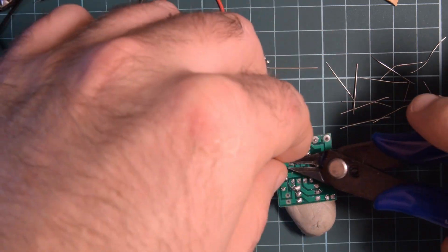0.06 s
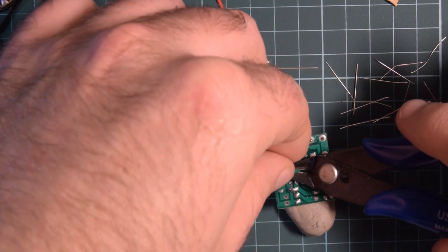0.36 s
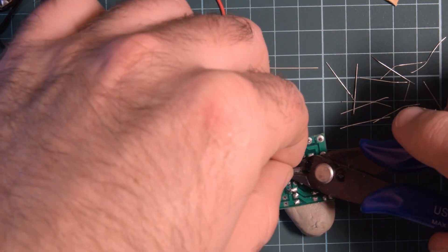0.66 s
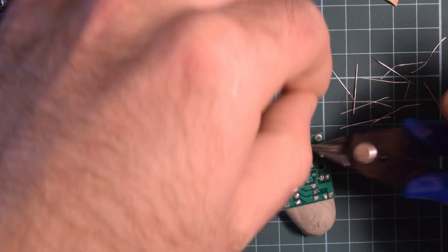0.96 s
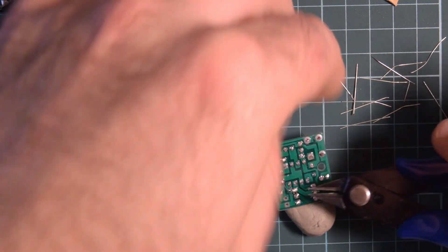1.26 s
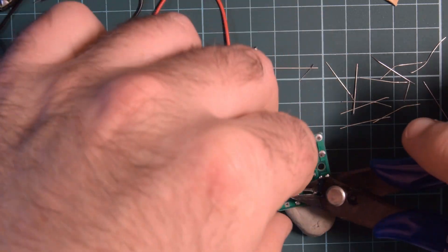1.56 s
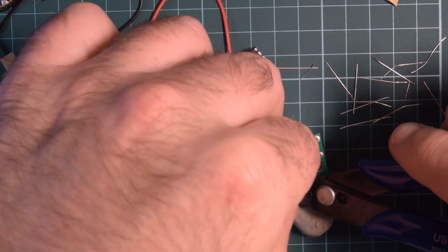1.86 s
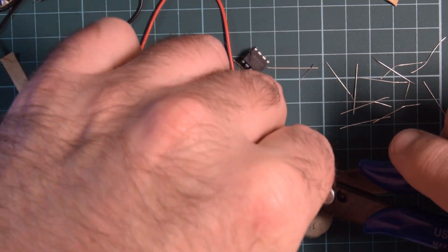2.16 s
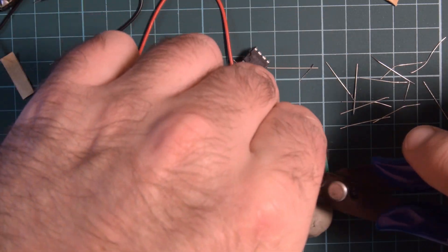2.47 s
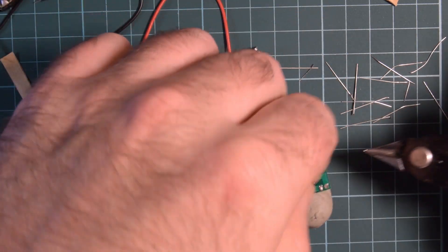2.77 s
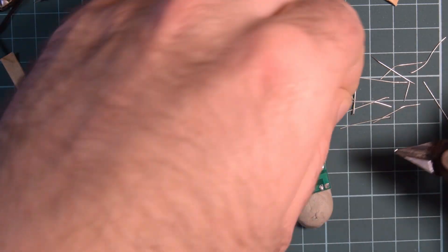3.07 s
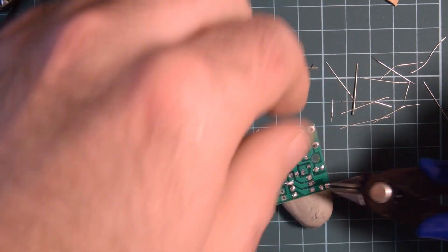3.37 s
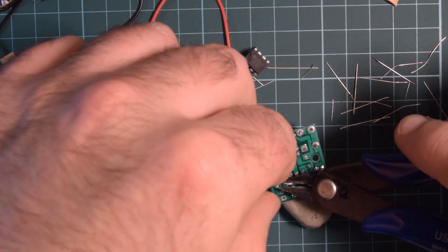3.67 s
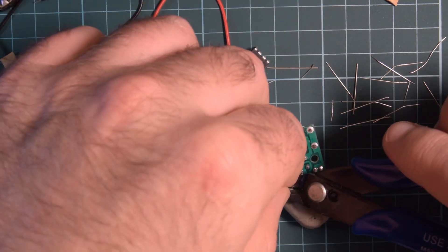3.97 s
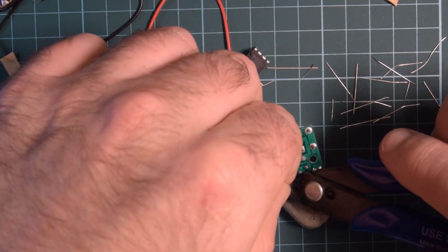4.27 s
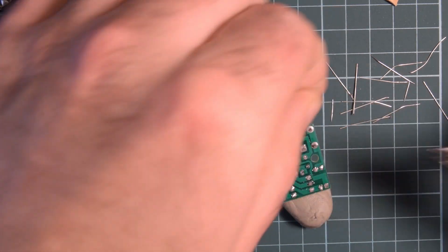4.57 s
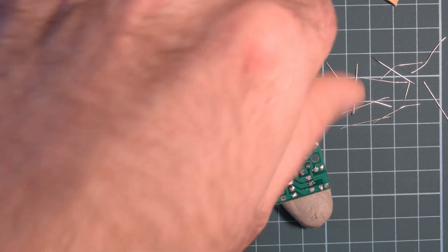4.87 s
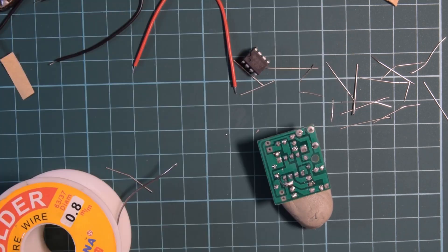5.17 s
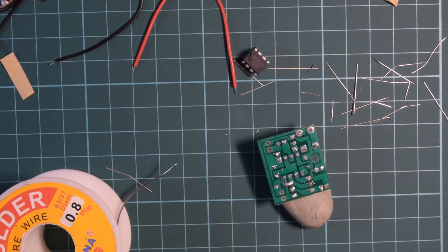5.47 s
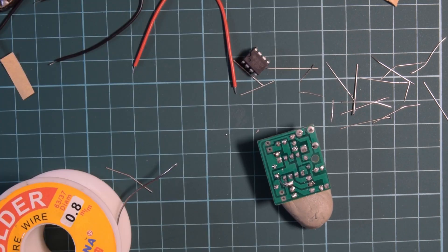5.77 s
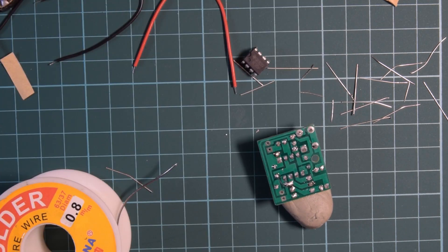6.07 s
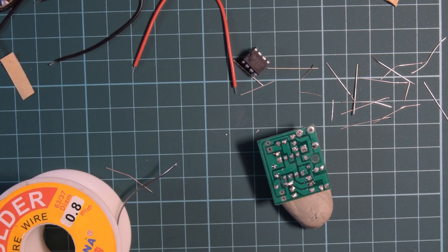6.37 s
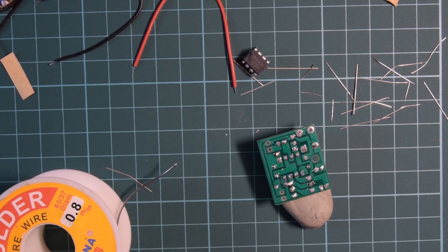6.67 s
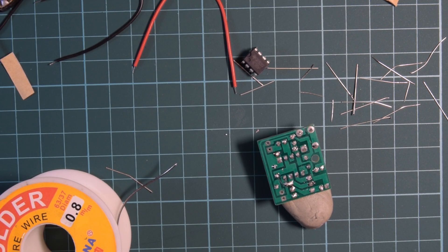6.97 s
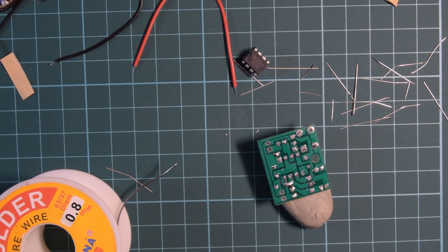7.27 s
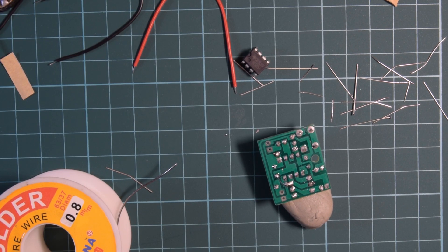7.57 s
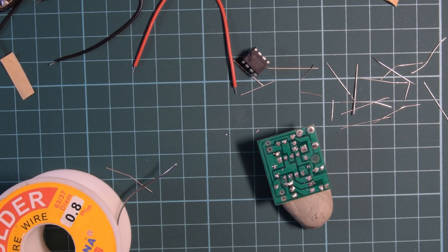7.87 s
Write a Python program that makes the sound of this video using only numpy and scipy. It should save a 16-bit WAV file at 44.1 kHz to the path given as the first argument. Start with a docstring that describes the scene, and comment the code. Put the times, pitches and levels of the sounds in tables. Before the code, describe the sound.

Close to the microphone at a workbench, a faint low hum fills a small dry room. Three spaced snaps come as cutters trim wire legs from a circuit board, with a soft bump between the second and third. Then the cutters and a plastic spool go down with a louder, hollow clatter. Ringing metal clacks follow, probably a soldering iron in its stand, mixed with light scratchy wiping and small jabs.

```python
"""A low hum in a small dry room, and a soft thump on a workbench mat. Close to the one microphone,
flush cutters snip three wire legs off a small circuit board, each a snap with a ring of the jaws.
The cutters are laid aside and a solder spool is set down, rocking on the booming bench top.
A metal tool, likely a soldering iron, clacks in its ringing stand and is wiped with a fine scratch.
A limiter on the microphone holds down the loudest knocks."""
import sys
import numpy as np
from scipy import signal
from scipy.fft import rfft, irfft, next_fast_len
from scipy.io import wavfile
from scipy.ndimage import uniform_filter1d, minimum_filter1d

SR = 44100
rng = np.random.default_rng(int(sys.argv[2]) if len(sys.argv) > 2 else 0)


def wav_record(signal):
    """Record a signal, one row per channel, as 16-bit PCM in the file named by sys.argv[1]."""
    frames = np.transpose(np.atleast_2d(signal))
    bounded = np.clip(frames, -1, 1)
    # unit amplitude maps onto the largest positive 16-bit level
    quanta = np.round(bounded * 32767).astype(np.int16)
    wavfile.write(sys.argv[1], SR, quanta)


N = 357651
RING_SIZE, FFT_SIZE = 8192, next_fast_len(N, real=True)
TIME, AGE = np.arange(N) / SR, np.arange(RING_SIZE) / SR  # seconds into the scene, and since a contact
FREQS = np.fft.rfftfreq(FFT_SIZE, 1 / SR)


def amp(db):
    """Decibels to gain."""
    return 10 ** (np.asarray(db) / 20)


def unit_rms(x):
    """Scale to an rms of one."""
    return x / np.sqrt(np.mean(x ** 2))


def at_level(x, db):
    """Scale a short sound so that its energy, spread over a fiftieth of a second, has this level."""
    return x * amp(db) * np.sqrt(SR / 50 / np.sum(x ** 2, axis=-1, keepdims=True))


def fade(t60):
    """Exponential decay, 60 dB down after t60 seconds."""
    return np.exp(-np.log(1000) * AGE / t60)


def swell(s, attack_s, hold_s, t60):
    """Pressure that builds, holds and dies away."""
    age = TIME - s
    rise = np.clip(age / attack_s, 0, 1) ** 2
    return rise * np.exp(-np.log(1000) * np.maximum(age - attack_s - hold_s, 0) / t60)


def colour_db(points, hz):
    """Read a spectrum on a log-frequency axis."""
    point_hz, db = np.transpose(points)
    return np.interp(np.log(hz + 1), np.log(point_hz), db)


def coloured(x, points):
    """Give a steady sound a spectrum."""
    return unit_rms(irfft(rfft(x, FFT_SIZE) * amp(colour_db(points, FREQS)), FFT_SIZE)[:N])


def resonant_noise(peaks):
    """Noise in steep resonances."""
    gain = sum(amp(db) / (1 + (2 * (FREQS - hz) / width) ** 2) for hz, width, db in peaks)
    return unit_rms(irfft(rfft(rng.standard_normal(FFT_SIZE)) * gain, FFT_SIZE)[:N])


def add(track, s, x):
    """Mix a short sound in at s seconds."""
    start = int(s * SR)
    track[start:start + len(x)] += x[:N - start]


def crack(colour, t60, slope, treble_db=0, bass_db=0, treble_hz=3500, bass_hz=450, rise_s=0.00073):
    """A dense cloud of short-lived modes; the low ones build up later and last longer."""
    edges = np.geomspace(90, 16500, 27)[:, None]
    lo, hi = edges[:-1], edges[1:]
    hz, bins = np.sqrt(lo * hi), np.fft.rfftfreq(RING_SIZE, 1 / SR)
    bands = irfft(rfft(rng.standard_normal(RING_SIZE)) * ((bins >= lo) & (bins < hi)))
    onset = 1 - np.exp(-(AGE / (rise_s + 1 / hz)) ** 2)
    bands = bands * fade(t60 * (2000 / hz) ** slope) * onset
    share = amp(colour_db(colour, hz)) * np.sqrt(hi - lo)
    shelves_db = treble_db / (1 + (treble_hz / hz) ** 3) + bass_db / (1 + (hz / bass_hz) ** 3)
    return np.sum(at_level(bands, shelves_db) * share / np.linalg.norm(share), axis=0)


def ring(modes, db, contact_s, sag=0, spread_db=4.0, detune=0.0016, settle_s=0.0023):
    """Struck modes, weighted anew each time; with sag, they start flat and glide quickly up to pitch."""
    chance = rng.standard_normal((len(modes), 3))
    clock = AGE - sag * settle_s * (1 - np.exp(-AGE / settle_s))
    ringing = np.zeros(RING_SIZE)
    for (hz, mode_db, t60), (weight, mistune, polarity) in zip(modes, chance):
        tone = np.sign(polarity) * np.sin(2 * np.pi * hz * (1 + detune * mistune) * clock)
        ringing += amp(mode_db + spread_db * weight) * tone * fade(t60)
    return at_level(ringing * (1 - np.exp(-AGE / contact_s)), db)


# Low resonances of the room. Each row: frequency in Hz, width in Hz, relative level in dB.
ROOM_MODES = [(34.5, 9, -12.5), (58.6, 20, -6), (86.12, 12, 0), (102.6, 9.8, -4.5), (123.08, 15, -7),
              (146.2, 14, -7), (171.2, 15, -16), (226.06, 15, -19.5)]
# Spectrum of the hiss. Each row: frequency in Hz, relative level in dB.
HISS_COLOUR = [(20, -7), (100, -26.5), (220, 10.5), (400, 13), (600, 5.5), (1000, 2.5), (2000, -2.5),
               (4000, -5), (8000, -5.5), (16000, -8.5)]


def room_tone(hum_db=-60.0, hiss_db=-76):
    """A low, wavering hum in the room's resonances, over faint even hiss."""
    hum = amp(hum_db) * resonant_noise(ROOM_MODES)
    return hum + amp(hiss_db) * coloured(rng.standard_normal(N), HISS_COLOUR)


# Low thumps on the bench. Each row: start in seconds, pitch in Hz, level in dB.
BENCH_THUMPS = [(.162, 339, -61), (0.173, 265, -65.5), (2.744, 413, -54.5), (2.827, 387, -56.5),
                (3.914, 398, -70), (5.631, 400, -61), (5.694, 350, -61), (5.755, 383, -67),
                (5.838, 245, -49), (5.947, 236, -43.5), (5.958, 160, -44.5)]


def bench_thumps():
    """Low, damped thumps, from soft presses on the mat and the stand bumping the bench."""
    out = np.zeros(N)
    for s, hz, db in BENCH_THUMPS:
        add(out, s, ring([(hz, 0, .055)], db, contact_s=0.00089))
    return out


# Wire legs parting close to the microphone. Each row: start in seconds, level in dB, treble in dB,
# board ring in dB, thud pitch in Hz, thud level in dB.
WIRE_SNIPS = [(0.7788, -44.5, -17, -58, 423, -63), (2.2287, -46.5, 2, -97, 341, -60.5),
              (4.303, -46.5, -20.5, -68, 380.6, -59)]
# Spectrum of the snap. Each row: frequency in Hz, relative level in dB.
SNAP_COLOUR = [(500, -35.5), (1000, -34), (1700, -29), (2300, -18), (3100, -20), (3900, -8), (5000, 1.5),
               (6300, -3.5), (7200, -2.5), (9000, -6.5), (11500, -5), (12600, -18), (15500, -34)]
# Modes of the jaws and of the board. Each row: frequency in Hz, relative level in dB, t60 in seconds.
JAW_MODES = [(4560, -4, .02), (4780, -1, .02), (4930, 0, .02), (5120, 0, .02), (5690, -4, .02),
             (5970, -3, .025), (6260, -3, .03)]
BOARD_MODES = [(2000, 13, 0.04), (2246, -5, 0.012), (2370, 15, 0.018)]


def cutters(slam_s=0.005, slam_db=-6):
    """The wire snaps, the jaws ring and slam shut, and the board jolts against the mat."""
    out = np.zeros(N)
    for s, db, treble_db, board_db, thud_hz, thud_db in WIRE_SNIPS:
        for lag_s, share_db in ((0, 0), (slam_s, slam_db)):
            snap = crack(SNAP_COLOUR, t60=.012, slope=.2, treble_db=treble_db,
                         treble_hz=7500, rise_s=.0003)
            add(out, s + lag_s, amp(db + share_db) * snap)
        add(out, s, ring(JAW_MODES, db - 8, contact_s=.0002))
        add(out, s, ring(BOARD_MODES, board_db, contact_s=0.0013))
        add(out, s, ring([(thud_hz, 0, .05)], thud_db, contact_s=0.00104))
    return out


# Hand, cutters and spool meeting the bench. Each row: start in seconds, level in dB, treble in dB,
# bench boom in dB, plastic clack in dB, number of contacts, seconds between them.
BENCH_KNOCKS = [(2.7397, -57.5, 1.5, -66, -56, 1, 0), (2.824, -66, -30, -58, -68, 1, 0),
                (5.3412, -41, 12, -37.5, -53, 3, .014), (5.474, -39.5, -3.5, -40, -50, 1, 0),
                (5.4826, -33.5, 2.5, -39.5, -40.5, 2, 0.0056), (5.518, -47, -12, -42, -60, 1, 0),
                (5.539, -43, -0.5, -40.5, -65, 3, .0195)]
# Spectrum of a knock. Each row: frequency in Hz, relative level in dB.
BENCH_COLOUR = [(100, -11), (160, -10), (250, -9), (420, 2.5), (650, -7), (850, -0.5), (1200, -5),
                (2000, -6), (3000, -12.5), (5000, -20.5), (7000, -30.5), (9000, -48.5), (11000, -54.5),
                (15000, -63)]
# Modes of bench top and hollow plastic. Each row: frequency in Hz, relative level in dB, t60 in seconds.
BENCH_MODES = [(250, -12, .1), (340, -6, .08), (405, -3, .06), (458, 0, .075), (505, -6, .05)]
PLASTIC_MODES = [(970, 0, 0.051), (1278, 11, 0.022), (1346, 12, 0.0084), (1460, -2, 0.0088),
                 (1460, 18, 0.0195), (1620, 5, 0.0076), (1950, -18, 0.0067)]


def bench_knocks(rock_loss_db=6.5, boom_loss_db=1):
    """Things set down rock to rest, each contact weaker: plastic clatter over the boom of the bench."""
    out = np.zeros(N)
    for s, db, treble_db, boom_db, clack_db, contacts, gap_s in BENCH_KNOCKS:
        for k in range(contacts):
            at, loss_db = s + k * gap_s, k * rock_loss_db
            knock = crack(BENCH_COLOUR, t60=0.052, slope=0.13, treble_db=treble_db, treble_hz=3030)
            add(out, at, amp(db - loss_db) * knock)
            add(out, at, ring(BENCH_MODES, boom_db - k * boom_loss_db, contact_s=0.00086))
            add(out, at, ring(PLASTIC_MODES, clack_db - loss_db, contact_s=0.00017))
    return out


# The iron against its stand. Each row: start in seconds, level in dB, treble in dB, ring in dB,
# lean of the ring to its higher modes in dB per octave.
IRON_CLACKS = [(5.814, -52.5, -29, -71.5, -3), (5.821, -45.5, -30, -66, 6), (5.870, -41, -17, -45, -1.5),
               (5.899, -37.5, 1.5, -36.5, 6), (5.912, -41, 5.5, -40, -4), (5.9317, -36, -6.5, -35.5, 2),
               (5.9419, -37.5, -1, -57, -3.5), (6.009, -53, -1, -48, -1.5),
               (6.285, -63, -28.5, -65.5, -3.5), (6.355, -62.5, -5.5, -67, 3), (6.543, -40, 8, -30, 8),
               (6.7762, -38.5, -2.5, -30.5, -19), (7.268, -74, -5.5, -76, -5), (7.290, -66.5, -9, -68, -1),
               (7.6137, -41.5, -2.5, -33, 8.5), (7.857, -67, -8, -73.5, -3.5),
               (8.1, -74.5, -7, -65.5, -6.5)]
# Spectrum of a clack. Each row: frequency in Hz, relative level in dB.
STAND_COLOUR = [(100, -21), (160, 7), (260, 4), (480, 0), (650, -1), (820, 7), (1200, -1), (2200, 1),
                (3200, -0.5), (4400, -2.5), (5700, -8), (6800, -21), (9500, -36), (15000, -69.5)]
# Modes of the stand. Each row: frequency in Hz, relative level in dB, t60 in seconds.
STAND_MODES = [(1930, 0, 0.0067), (1940, 2.5, 0.014), (2010, -0.5, 0.033), (2080, 4, 0.06),
               (2235.3, -2, 0.032), (2430, 3, 0.017), (2433, 4, 0.051), (2870, -12.5, 0.049),
               (3030, -9.5, 0.033), (3350, -0.5, 0.023), (3653, -14, 0.021), (4400, -20, 0.024)]


def iron_in_stand(rebound_s=.007, rebound_db=-9.5, rebound_ring_db=-9, hard_db=-37.5, bass_per_db=0.3973):
    """The iron clacks and rebounds in its stand, whose close modes beat against each other."""
    out = np.zeros(N)
    lowest_hz = STAND_MODES[0][0]
    for s, db, treble_db, ring_db, lean_db in IRON_CLACKS:
        # the place struck favours some modes
        modes = [(hz, level + lean_db * np.log2(hz / lowest_hz), t60) for hz, level, t60 in STAND_MODES]
        rebound = (s + rebound_s, db + rebound_db, ring_db + rebound_ring_db)
        for at, hit_db, modes_db in ((s, db, ring_db), rebound):
            bass_db = bass_per_db * (hard_db - hit_db)  # softer contacts are rounder
            clack = crack(STAND_COLOUR, t60=0.05, slope=0.44, treble_db=treble_db, bass_db=bass_db)
            add(out, at, amp(hit_db) * clack)
            add(out, at, ring(modes, modes_db, contact_s=0.0018, sag=0.18))
    return out


# The strike on the iron's barrel: start in seconds, level in dB, ring in dB.
BARREL_STRIKE = (6.0202, -37, -39)
# Its spectrum. Each row: frequency in Hz, relative level in dB.
BARREL_COLOUR = [(120, -20), (380, 1), (650, -41), (900, -5), (1350, -18.5), (2300, -12.5), (3100, -6),
                 (4400, 0.5), (6000, -10), (8000, -26), (10000, -59.5), (15000, -45)]
# Modes of the barrel. Each row: frequency in Hz, relative level in dB, t60 in seconds.
BARREL_MODES = [(2310, 8.5, 0.03), (3120, 4, 0.097), (3463, -8, 0.066), (4200, 0, .06), (4160, -1, 0.053),
                (4300, 3, 0.055), (4530, 0, .06), (5120, -13, 0.068), (6490, -15, 0.045), (9600, -24, 0.14)]


def barrel_clink():
    """One bright strike sets the iron's barrel ringing."""
    out = np.zeros(N)
    s, db, ring_db = BARREL_STRIKE
    add(out, s, amp(db) * crack(BARREL_COLOUR, t60=0.026, slope=0.61, rise_s=0.00034))
    add(out, s, ring(BARREL_MODES, ring_db, contact_s=0.00014))
    return out


# The tip dragged through its cleaner. Each row: start and rise in seconds, level in dB, t60 in seconds.
TIP_STROKES = [(6.34, 0.014, -61.5, 0.42), (6.65, 0.05, -56.5, 0.57), (6.85, .05, -71, 1.5),
               (7.27, 0.048, -67, 0.3), (7.43, 0.18, -74.5, 1.9), (7.87, 0.089, -71.5, 0.1)]
# The tip jabbed into the cleaner's holder. Each row: start in seconds, level in dB.
TIP_JABS = [(6.936, -64), (6.984, -70.5), (7.119, -53), (7.337, -54.5), (7.922, -68)]
# Spectrum of the scratch. Each row: frequency in Hz, relative level in dB.
TIP_COLOUR = [(600, -16), (1100, 0), (1600, 0), (2200, 5), (3000, 1.5), (3700, -2.5), (4400, -2.5),
              (5900, -10), (6500, -15.5), (9000, -24), (15000, -47)]
# Resonances of the holder and of thin metal in it. Each row: frequency and width in Hz, relative dB.
HOLDER_MODES = [(495, 150, -4), (774, 160, -0.5), (880, 95, -8), (1990, 240, -8), (4280, 860, -19)]
THIN_METAL_MODES = [(9650, 336, 0)]
# The thin metal springing free: start and rise in seconds, level in dB, t60 in seconds.
METAL_FLICK = (6.412, .018, -78, .2)


def wiping(catches_per_s=5000, grain_db=-5.0, jab_scratch_db=-7, stroke_hollow_db=-14.5, zing_db=-21):
    """The tip slips in many tiny catches; its holder answers with a hollow rub and a faint zing."""
    drag = sum(amp(db) * swell(s, attack_s, 0, t60) for s, attack_s, db, t60 in TIP_STROKES)
    jab = sum(amp(db) * swell(s, attack_s=0.0049, hold_s=0.012, t60=.16) for s, db in TIP_JABS)
    friction = np.hypot(drag, amp(jab_scratch_db) * jab)
    pressure = np.hypot(jab, amp(stroke_hollow_db) * drag)
    catches = rng.standard_normal(N) * (rng.random(N) < catches_per_s / SR)
    catches *= amp(grain_db * np.minimum(rng.exponential(size=N), 4))  # uneven in strength
    scratch = coloured(catches, TIP_COLOUR) * friction
    hollow = resonant_noise(HOLDER_MODES) * pressure
    s, rise_s, db, t60 = METAL_FLICK
    touch = amp(zing_db) * np.minimum(friction, amp(-69))  # any touch sets the thin metal going
    zing = resonant_noise(THIN_METAL_MODES) * (touch + amp(db) * swell(s, rise_s, 0, t60))
    return scratch + hollow + zing


def room(x, early_db, tail_db, early_t60, tail_t60, dull_hz=7500):
    """Direct sound, quick reflections off the bench and things on it, then a small room's short tail."""
    early = rng.standard_normal(RING_SIZE) * fade(early_t60) * (AGE > .002)
    # small things reflect little bass
    early = signal.sosfilt(signal.butter(1, 600, "high", fs=SR, output="sos"), early)
    tail = rng.standard_normal(RING_SIZE) * fade(tail_t60) * (1 - np.exp(-AGE / 0.0048))
    tail = signal.sosfilt(signal.butter(2, dull_hz, fs=SR, output="sos"), tail)
    response = amp(early_db) * early / np.linalg.norm(early) + amp(tail_db) * tail / np.linalg.norm(tail)
    return x + signal.oaconvolve(x, response)[:N]


def scene():
    """The workbench in mono, from one close microphone."""
    snips = room(cutters(), early_db=-15.5, tail_db=-13.5, early_t60=0.052, tail_t60=0.15, dull_hz=10000)
    bench = room(bench_knocks() + bench_thumps(), early_db=-14.5, tail_db=-14, early_t60=.13, tail_t60=.24)
    iron = room(iron_in_stand() + barrel_clink(), early_db=-10, tail_db=-14.5, early_t60=.05, tail_t60=.2)
    return (snips + bench + iron + wiping() + room_tone())[None]


def record(dry, ceiling_db=-19, top_hz=15800):
    """A fast limiter after the microphone holds the loudest knocks down; the top is cut."""
    gain = np.minimum(1, amp(ceiling_db) / (np.abs(dry) + 1e-9))
    gain = uniform_filter1d(minimum_filter1d(gain, size=64), size=48)
    return signal.sosfilt(signal.ellip(10, .2, 70, top_hz, fs=SR, output="sos"), dry * gain)


dry = scene()
out = record(dry)
wav_record(out)
```